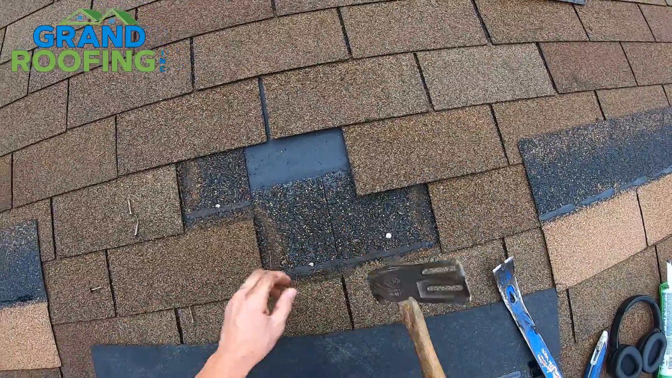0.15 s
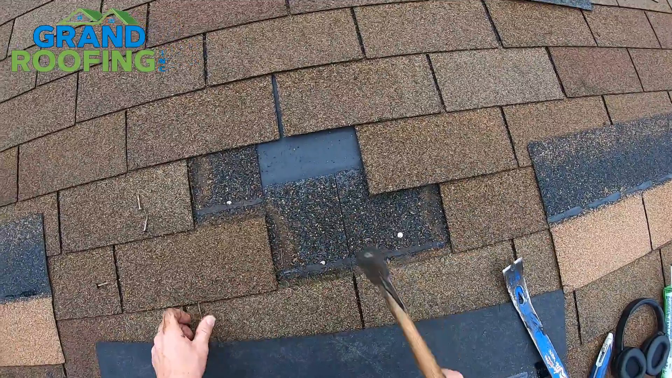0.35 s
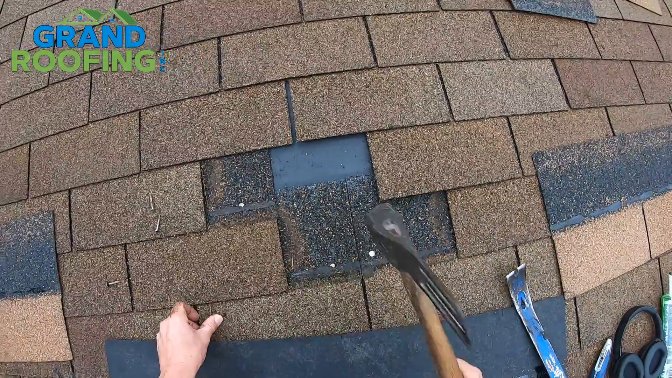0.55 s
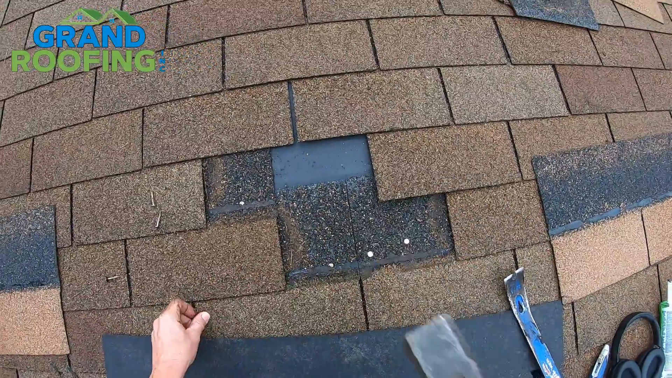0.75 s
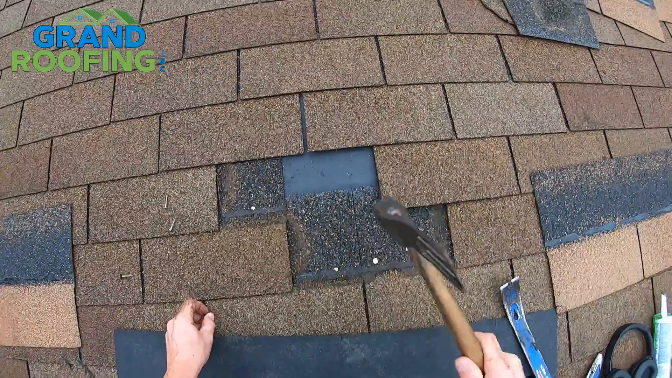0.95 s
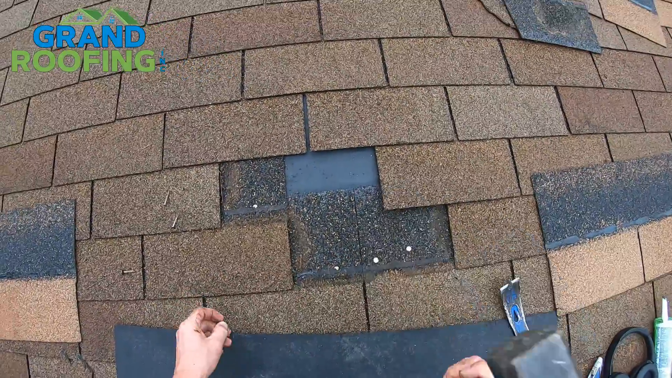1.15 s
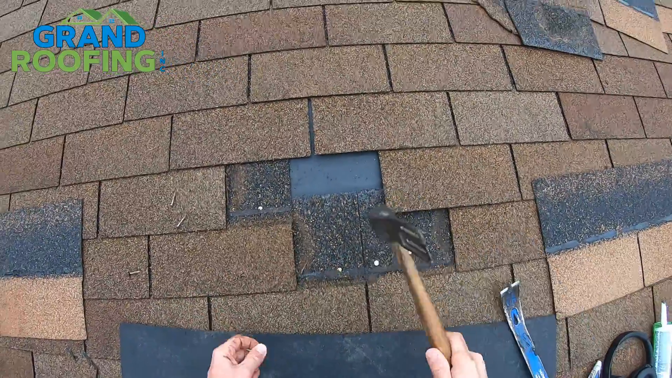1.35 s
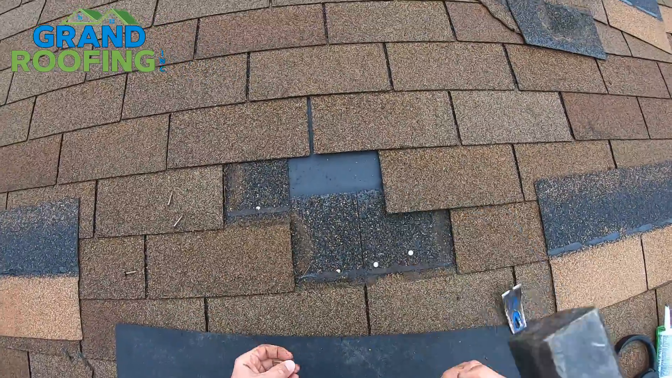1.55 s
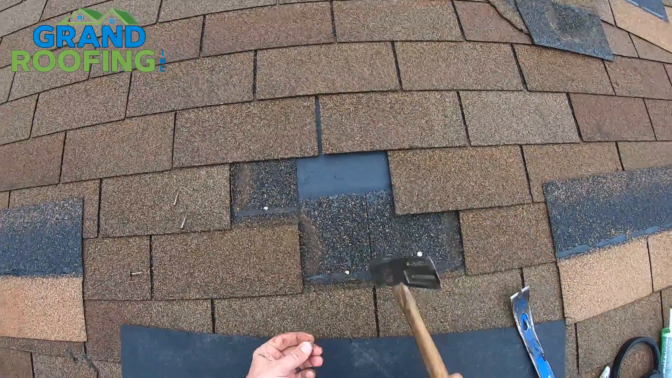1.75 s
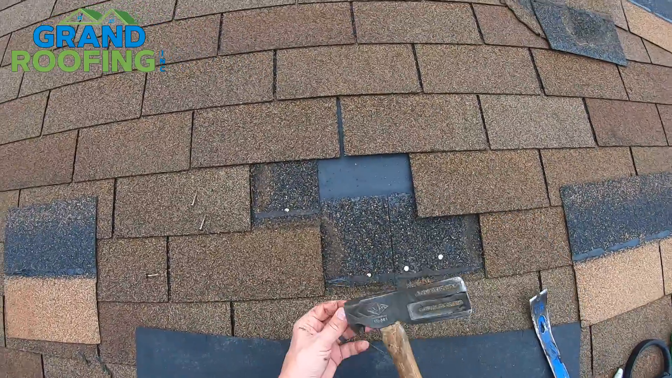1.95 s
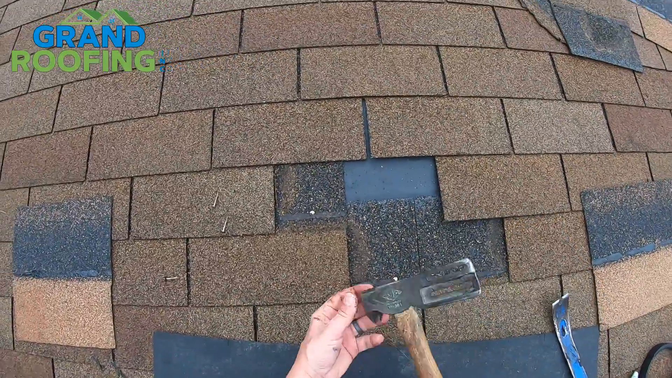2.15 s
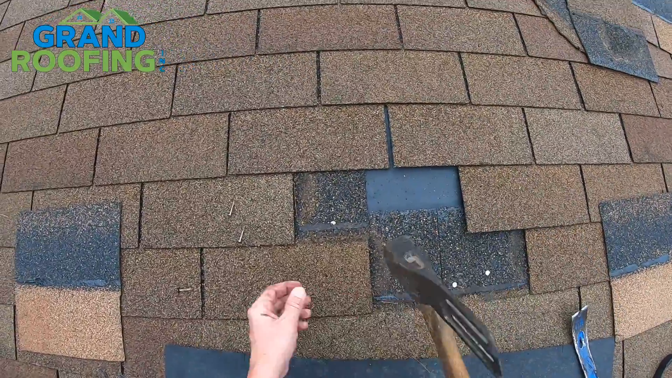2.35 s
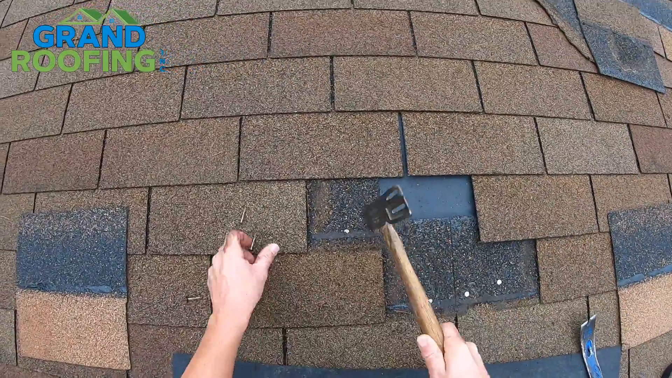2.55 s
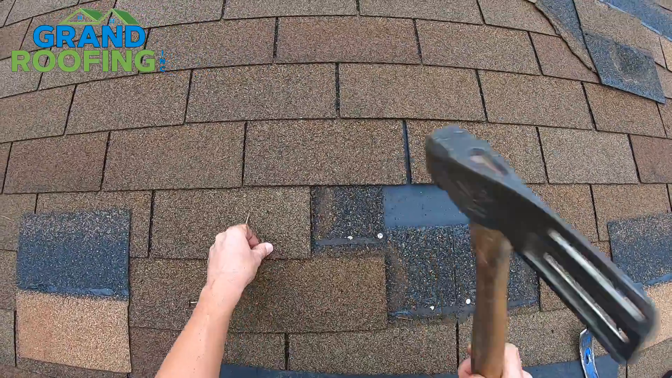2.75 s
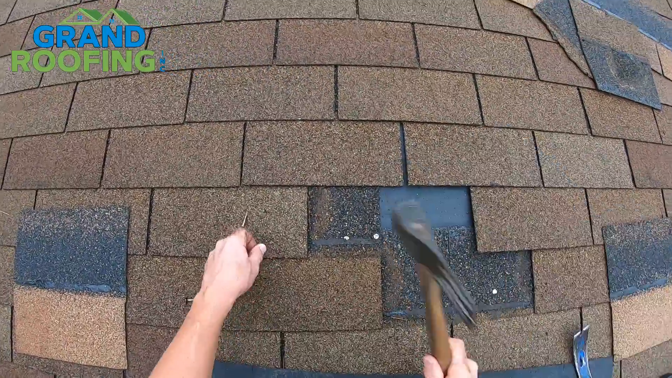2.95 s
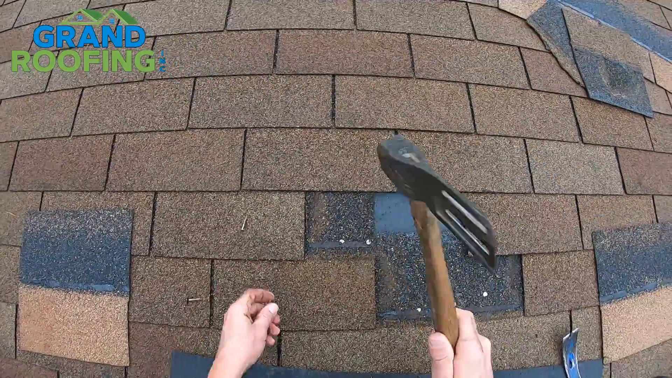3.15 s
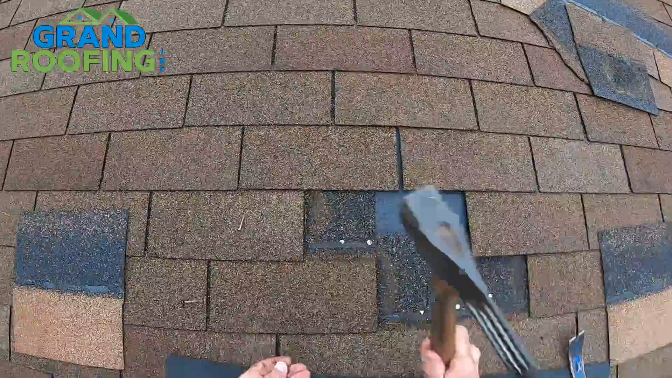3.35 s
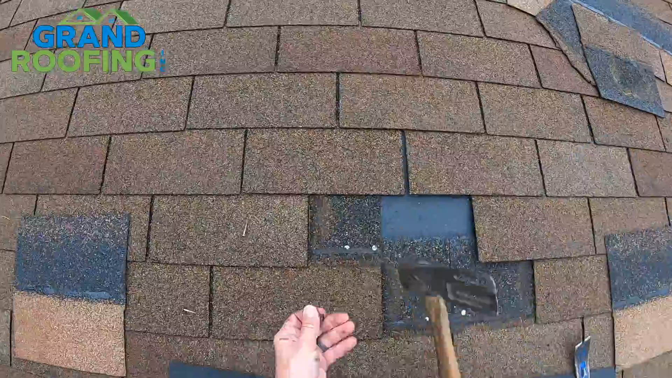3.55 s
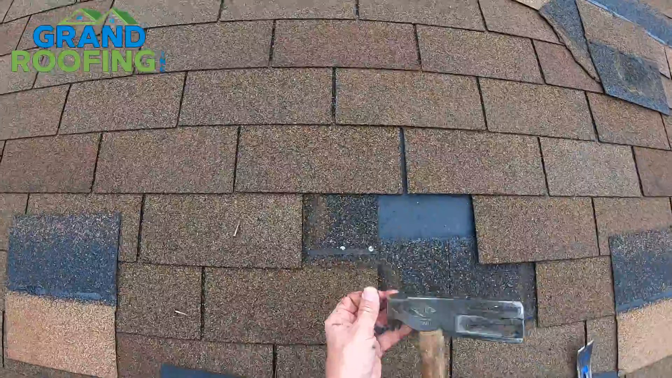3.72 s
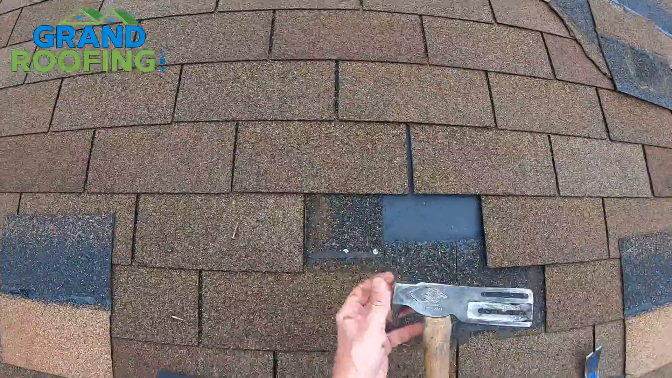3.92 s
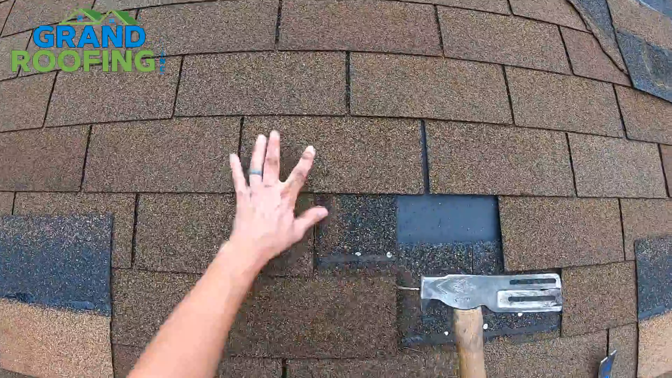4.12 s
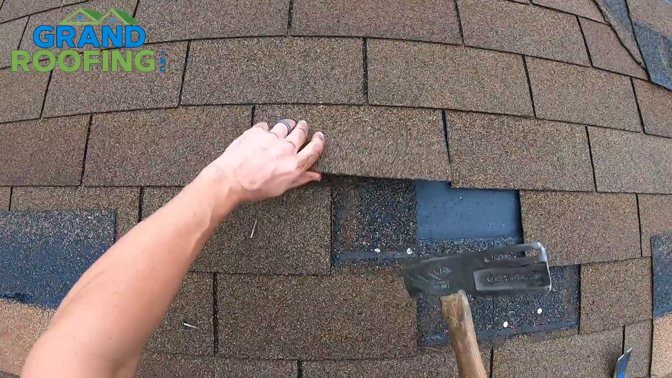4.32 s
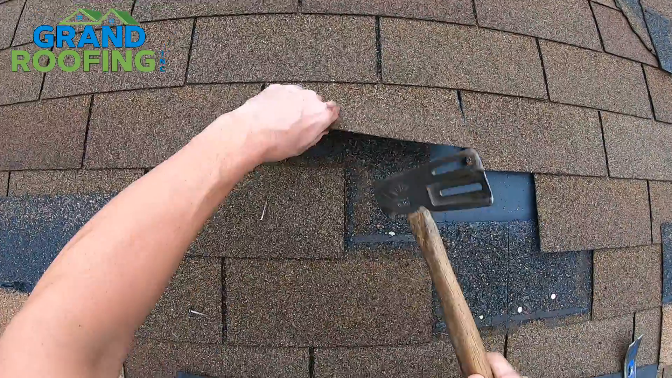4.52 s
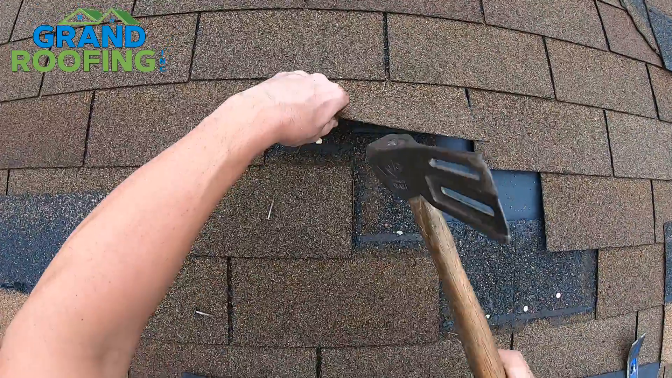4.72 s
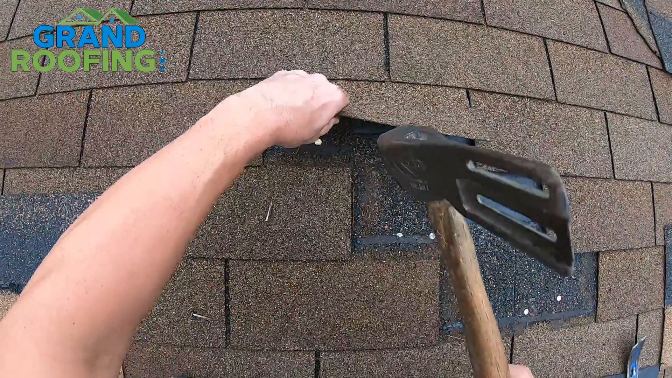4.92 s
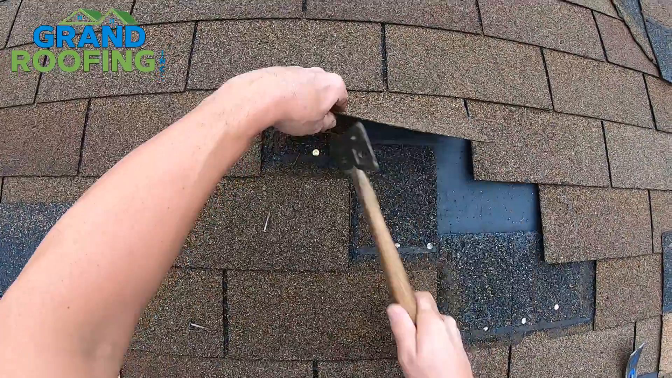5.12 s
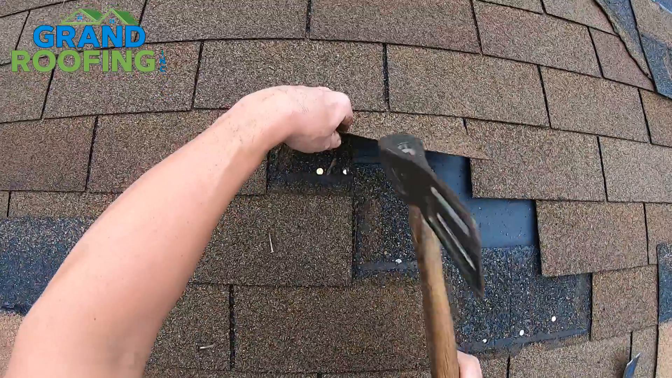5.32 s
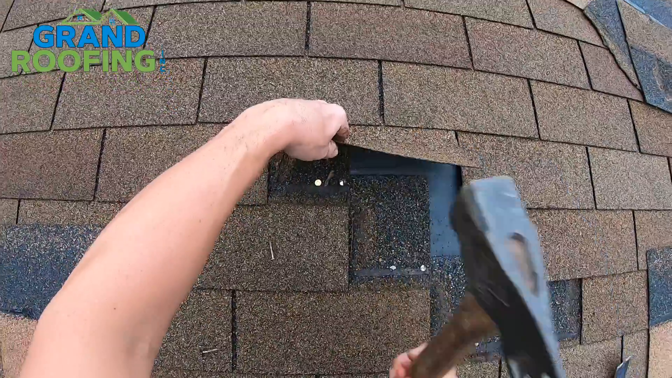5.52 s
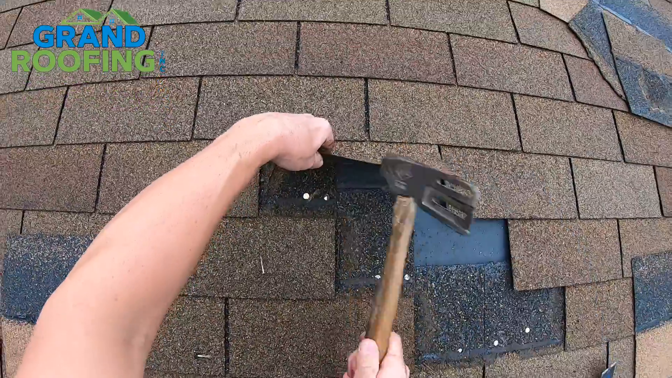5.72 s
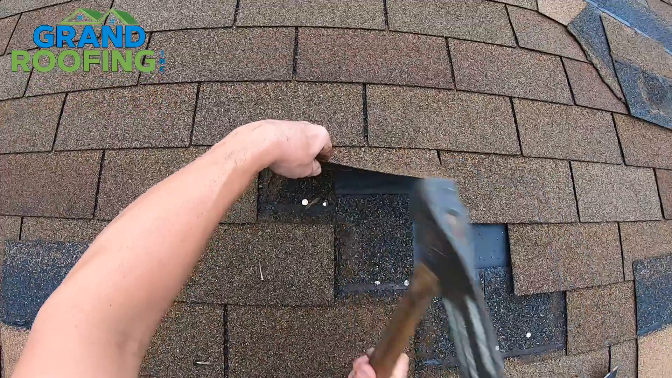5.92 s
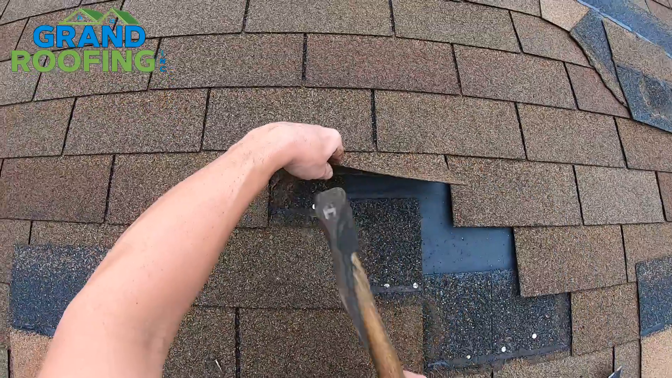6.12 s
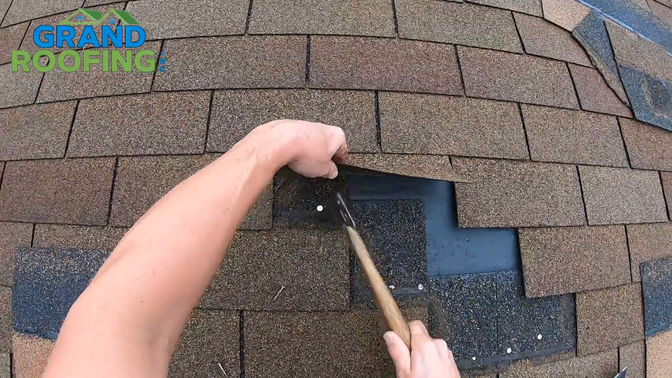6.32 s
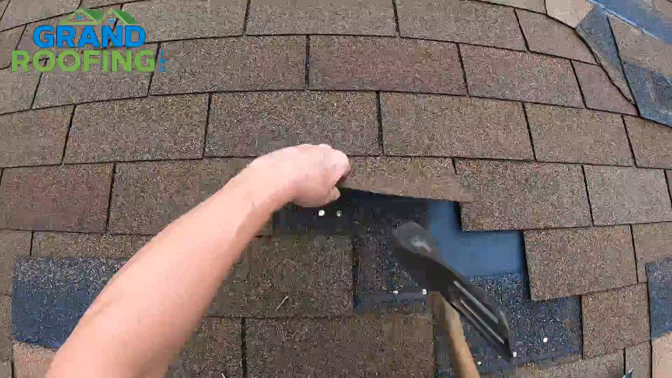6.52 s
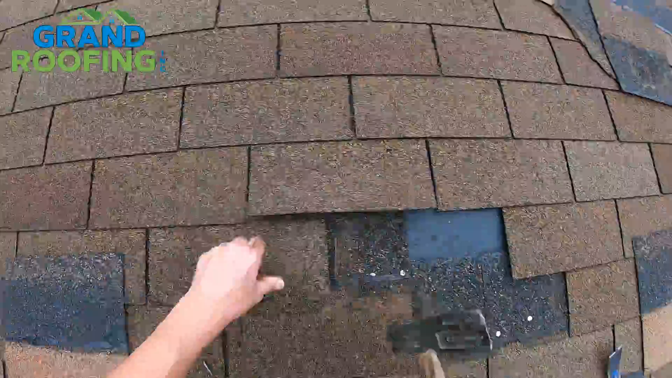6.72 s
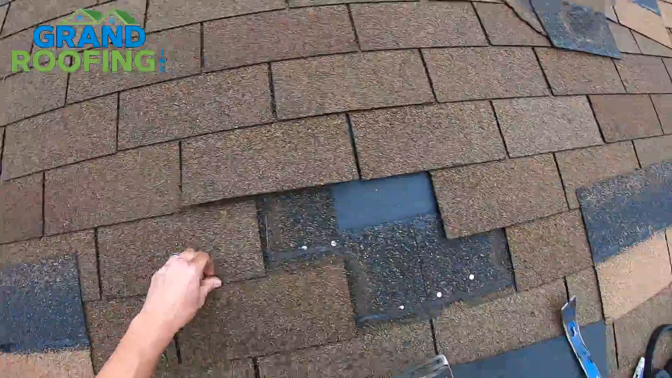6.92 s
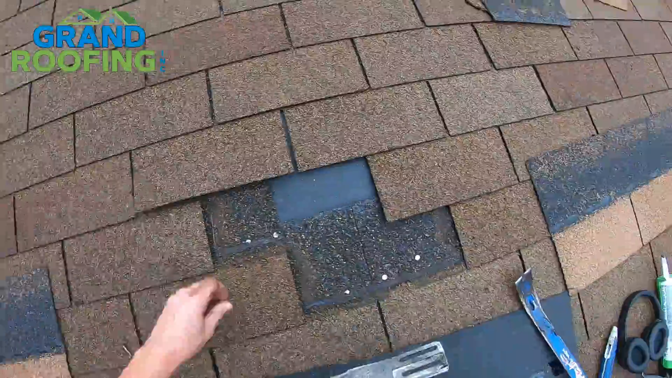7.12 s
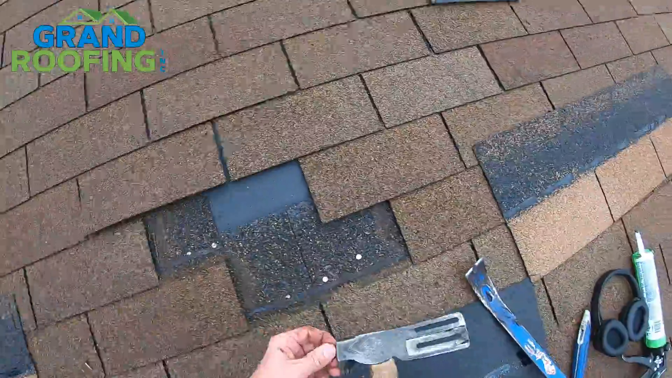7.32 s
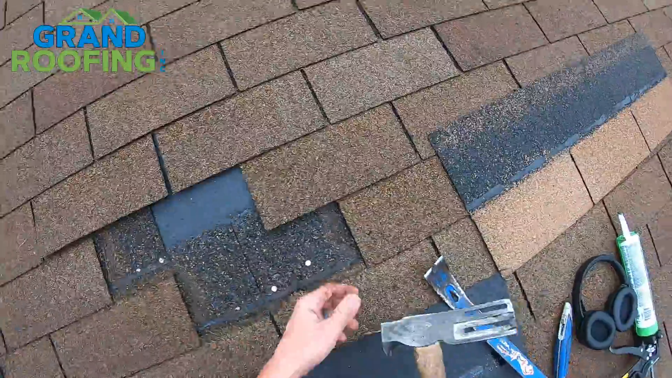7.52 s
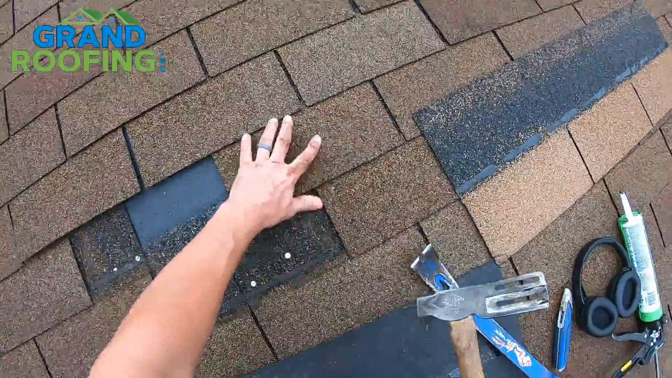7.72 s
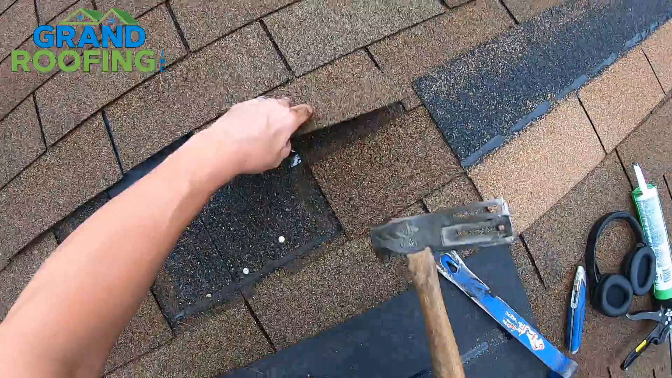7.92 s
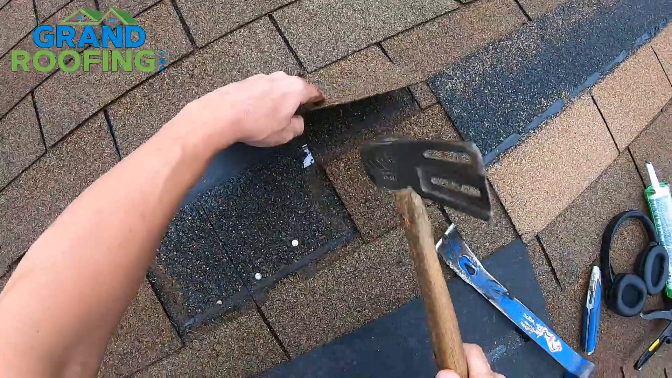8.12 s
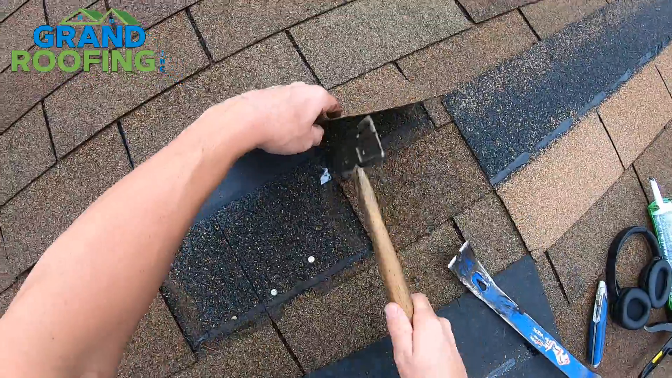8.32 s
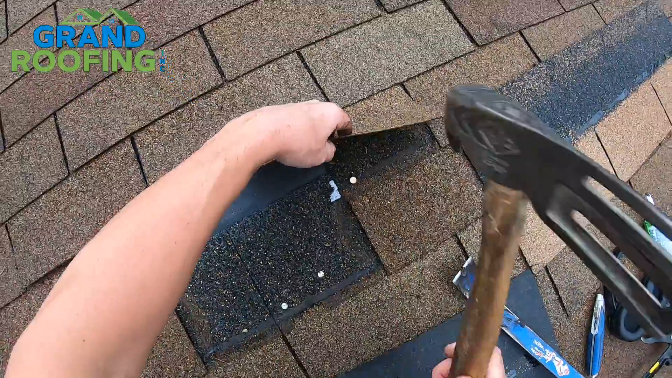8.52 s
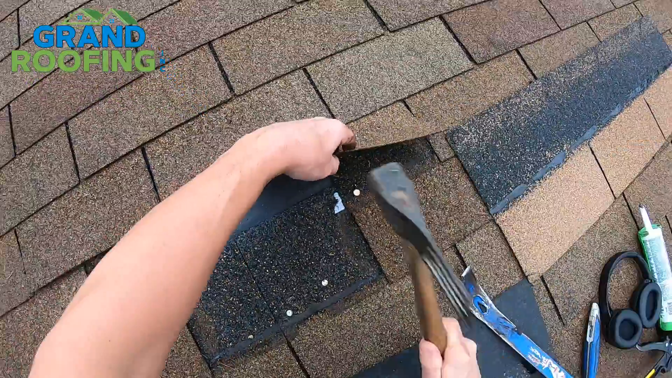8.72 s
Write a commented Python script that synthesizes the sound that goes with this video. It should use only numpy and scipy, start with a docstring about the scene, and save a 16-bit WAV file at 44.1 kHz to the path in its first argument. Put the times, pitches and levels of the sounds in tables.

```python
"""A far bird's whistle, a faint tink of steel and a soft push on wood open over outdoor hush and insects.
Then a roofer's hatchet drives nails through asphalt shingles close by: each blow is a burst of force
that sets the modes of the wooden deck ringing, with bands of noise fading in before it and out after it.
Granules, a skittering nail and snapping shingles are short resonant clicks; a lifted shingle scrapes as
filtered grains. The steel head rings as fading sines; the bird is gliding sines with a noisy echo."""
import sys
import numpy as np
from scipy import signal
from scipy.fft import rfft, irfft, next_fast_len
from scipy.io import wavfile
from scipy.ndimage import uniform_filter1d

SR = 44100
rng = np.random.default_rng(int(sys.argv[2]) if len(sys.argv) > 2 else 0)


def store_pcm(level_fs):
    """Save levels as 16-bit WAV."""
    pcm = np.round(np.clip(level_fs, -1, 1) * 32767).astype(np.int16)
    wavfile.write(sys.argv[1], SR, np.atleast_2d(pcm).T)


N = 386757

TIME = np.arange(N) / SR   # s
BLOW_TIME = TIME[:SR * 3 // 4]   # time within one event, s
OPPOSITE = np.array([[1], [-1]])   # adds to the left, subtracts from the right
CUTOFF_HZ = 16000   # nothing much is left above this
LEVEL_WINDOW_S = .025   # a blow's energy is counted as if spread over this time

# Outdoor air noise, relative: [f/Hz, level/dB per Hz]
AIR_COLOUR = [(25, -5), (60, -5), (150, -1), (330, -2.5), (500, -10), (780, -9.5), (1200, -17),
              (2500, -22.5), (3800, -23), (6000, -25.5), (7500, -26.5), (10000, -43.5), (15000, -53)]
# Far-off hush over time: [t/s, level/dB]
HUSH_CURVE = [(0.0, -72.5), (0.51, -69.5), (6.96, -66), (7.23, -69), (8.77, -63)]
# Insect hiss over time, before the trim in air(): [t/s, level/dB]
INSECT_CURVE = [(0.0, -72), (0.61, -72), (2.32, -84), (2.88, -78), (4.2, -84), (4.44, -75), (7.52, -79),
                (8.13, -70.5), (8.77, -81)]
# Insect hiss, relative: [f/Hz, level/dB per Hz]
INSECT_COLOUR = [(2500, -40), (4000, -13), (4600, -1), (5100, 0), (5900, -9.5), (6800, -6), (8000, -17),
                 (11000, -40)]

# Bird calls, before the trim in bird(): [t/s, level/dB, gap to the second whistle/s]
BIRD_CALLS = [(0.0, -57.5, .16), (4.82, -61.5, 0.092), (7.18, -65.5, .1)]
# First whistle, one voice: [start f/Hz, end f/Hz, relative level/dB]
FIRST_WHISTLE = [(6550, 7130, 0)]
# Second whistle, two voices at once: [start f/Hz, end f/Hz, relative level/dB]
SECOND_WHISTLE = [(7330, 8190, -6.5), (6550, 6900, -7.5)]

# Low rumble of the roof frame, relative: [f/Hz, level/dB per Hz]
RUMBLE_COLOUR = [(20, -5), (40, 1), (70, -5), (120, -15), (250, -40.5), (1000, -80.5)]
# Rumble after an average blow, its decay time, a press relative to its own level, and the level at rest
SWAY_DB, SWAY_T60_S, PRESS_SWAY_DB, REST_DB = -51, 1.9, -11, -80

# Hand and knee pressing on the deck: [t/s, peak level/dB]
PRESSES = [(0.03, -51), (4.045, -50.5), (4.24, -48), (4.85, -48.5), (6.879, -55), (7.835, -46)]
# Shingle rubbing over grit, dull under a palm and bright sheet on sheet:
# [start t/s, length/s, level before dulling/dB, treble edge f/Hz]
RUBS = [(2.679, 0.069, -51, 7000), (4.245, .3, -53, 4000), (5.151, 0.11, -59.5, 7000),
        (5.265, .095, -41.5, 8970), (5.775, 0.056, -39.5, 9000), (6.72, .15, -61, 3980),
        (6.86, .08, -51, 1000), (6.972, .085, -48, 900), (7.821, .07, -48, 1200), (7.89, .21, -53, 4500)]
# Scraped grit, relative: [f/Hz, level/dB per Hz]
RUB_COLOUR = [(100, -5.5), (400, 1), (800, 2), (2200, 0), (4500, -4), (8000, -12), (11000, -21),
              (16000, -32)]
RUB_ATTACK_S, RUB_RELEASE_SHARE = 0.013, 0.49   # quick bite; share of the stroke spent easing off

# Ringing modes of the free steel head: [f/Hz, relative level/dB, 60 dB decay/s]
HEAD_MODES = [(3375, -15, .3), (3510, 1, .4), (4500, -20, .08), (6648, -24, .5), (7687, -14, 0.49),
              (9502, -28, .18)]
# The head brushes a nail: [t/s, level/dB, extra level of the upper modes/dB]
TINKS = [(0.006, -55.5, -22), (1.93, -78, 26), (3.575, -53, -2), (3.668, -62, 14), (3.885, -63.5, -6),
         (5.8, -59, -8), (7.417, -42.5, -1.5)]
# Blows ring the head too, more on a stiffer spot
BLOW_RING_DB, BLOW_RING_UPPER_DB, RING_DB_PER_OCTAVE = -59, -5, 32

# Clearest light ticks, a loose nail skittering at 0.64 to 0.87 s and granules elsewhere,
# before the trims in tick(): [t/s, peak level/dB]
LIGHT_TICKS = [(0.5256, -23), (0.6397, -22), (0.6743, -33), (0.694, -26.5), (0.7356, -25), (0.7694, -29),
               (0.838, -31.5), (0.8587, -27), (0.9791, -24), (2.0007, -39.5), (2.6984, -27.5), (2.837, -38),
               (3.6566, -22.5), (6.1818, -31), (6.192, -28), (6.2875, -15), (6.5275, -30), (6.6187, -37.5),
               (6.848, -30.5), (6.8763, -30.5), (7.416, -30), (8.45, -26)]
# Stiff shingle snapping as it bends, before the trims in tick():
# [t/s, peak level/dB, centre f/Hz, body level/dB]
SNAPS = [(4.239, -36, 2650, -47), (4.4281, -27.5, 4930, -34), (4.4318, -23.5, 4300, -30),
         (4.702, -39, 3300, -48), (5.2132, -26, 3310, -29), (5.3275, -19, 3500, -41),
         (5.7795, -28.5, 3620, -39), (5.7994, -22, 3170, -37), (6.9069, -26, 4500, -41),
         (7.017, -37, 3280, -43), (7.9655, -28.5, 4840, -33), (7.9922, -26, 4600, -18.5),
         (8.0224, -31.5, 2680, -51), (8.2427, -29, 4290, -31.5)]
LIGHT_TICK_HZ, LIGHT_TAP_DB = 3800, -27   # average click centre; the tap relative to it, before trims
# Fainter granules: pace, level before trims, random spread, and how they shrink with the wait
STRAYS_PER_S, STRAY_DB, STRAY_SPREAD_DB, STRAY_FALL_DB_PER_S = 14, -39, 3.5, 25
# Boards settling: peak level before fading, time span, fading with the wait
SETTLE_DB, SETTLE_WITHIN_S, SETTLE_FALL_DB_PER_S = -45, 0.27, 30.5

# Hatchet blows: [t/s, strength/dB, stiffness of the spot as a pitch factor,
# extra knock of the board/dB, extra steel edge/dB]
BLOWS = [(0.4936, 0.53, .95, 0, -3), (0.948, 0.76, .93, 0, -2.5), (1.3599, -2.4, .97, 2.5, -5),
         (1.7863, 0.65, .95, 2.5, 4), (2.615, -4, 1.02, -2.5, 1), (3.0973, -0.6, 1, -3, -4),
         (3.5161, .5, 1.12, 3.5, 0), (5.2397, 0, 1.02, 0.2, 8), (5.7123, -0.4, 1, 1, -5),
         (6.095, 1.5, 1.1, 3, -4), (6.445, 0.6, 1.1, 2, 1), (8.417, 1.7, 1.04, -6.5, 7.5)]
# Average blow as boom, thud, knock, clack, crack and steel edge, before the trims in blows();
# harder is brighter: [level/dB, dB gained per dB of strength]
REGISTERS = [(-19, .5), (-18.5, .5), (-22, .9), (-24, .8), (-27, 1.87), (-38, 1)]
# Where one register gives way to the next: [f/Hz]
REGISTER_EDGES = [120, 260, 630, 1500, 5000]
BOOM_LOSS_DB_PER_OCTAVE = 19   # a stiffer spot booms less
# Roof deck, from whole-sheet bending to short waves round the nail; each blow varies pitch and level:
# [f/Hz, relative level/dB, 60 dB decay/s]
DECK_MODES = [(60.5, -1, .13), (91.6, -3, .12), (143.6, 0.5, .055), (223, -2, .04), (313, 0, 0.036),
              (418, -2.5, .03), (556, -7, .03), (707, -1, .035), (793, -1, .04), (1002, -3, .025),
              (1192, -2, 0.021), (1676, -3.5, 0.0079), (2090, -2, .007), (2900, 1, .007), (3270, 1, 0.0076),
              (4100, -2, 0.0031), (5240, 0, 0.0037), (6960, -0.5, 0.005), (8770, -9, 0.0037)]
# Sound spreading through rafters and yard, before the trims in spread():
# [f/Hz, early level/dB, early 60 dB decay/s, late level/dB, late 60 dB decay/s]
SPREAD = [(35, -47, 0.29, -52, 1.2), (70, -31, .22, -43.5, 0.8), (140, -28, 0.18, -41.5, 0.55),
          (280, -30, .07, -57, 0.85), (560, -33, .065, -60.5, 1.4), (1100, -31, .065, -60.5, 1.0),
          (2200, -34.5, 0.084, -61.5, 1.1), (4504, -38.5, 0.11, -61, 0.7), (8000, -52, 0.1, -71.5, .8),
          (13000, -70, .08, -88, .8)]
# Soft dull noise fading in before each crack, before the trim in spread(); rows are blended:
# [f/Hz, level/dB, 60 dB rise/s]
FADE_IN = [(35, -48, 0.28), (70, -27.5, 0.1071), (140, -19, 0.0633), (280, -23, 0.01), (560, -26, 0.0647),
           (950, -28.5, 0.0377), (1400, -47, 0.048), (2700, -48, 0.12), (4500, -63, -0.05),
           (13000, -88, 0.5)]

# Two microphone ports: [f/Hz, left minus right level/dB, lead of the left/rad]
PORTS = [(60, 0.36, -0.19), (350, -0.85, 0.27), (650, -4.5, 0.27), (850, -6.5, -.2), (1030, -7.5, 0.32),
         (1400, -4.5, .55), (2000, -3, 0.0033), (2400, 0.5, -0.013), (3100, -3.5, 0.004),
         (5004, -2.5, -0.71), (7000, -4.5, -0.84), (8200, -3, -0.83), (9300, -3, 0.72), (15000, -2, 0.18)]


def from_db(db):
    """Turn decibels into a gain."""
    return 10 ** (np.asarray(db) / 20)


def rms_one(x):
    """Scale a sound so that its average strength (rms) is 1."""
    return x / np.sqrt(np.mean(x ** 2) + 1e-20)


def at_hz(rows, hz):
    """Read every column of a table at a frequency, blending rows on a log-frequency axis."""
    freq, *columns = np.transpose(rows)
    log_hz = np.log(np.maximum(hz, 1))
    return [np.interp(log_hz, np.log(freq), column) for column in columns]


def add(out, s, sound):
    """Mix a sound in from time s, cutting off whatever falls outside the scene."""
    start = round(s * SR)
    first = max(start, 0)
    last = max(min(start + sound.shape[-1], N), start)
    out[..., first:last] += sound[..., first - start:last - start]


def fade(t, t60):
    """Die away smoothly, losing 60 dB in t60 seconds."""
    return np.exp(-np.log(1000) * t / t60)


def butter(x, order, hz, kind="low"):
    """Filter a sound: keep the lows, the highs or a band."""
    return signal.sosfilt(signal.butter(order, hz, kind, fs=SR, output="sos"), x)


def resonate(x, hz, t60):
    """Let a force drive one resonance, whose gain is 1 at its peak frequency."""
    r = fade(1 / SR, t60)
    drive = x.copy()
    drive[..., 2:] -= x[..., :-2]
    feedback = [1, -2 * r * np.cos(2 * np.pi * hz / SR), r * r]
    return signal.lfilter([(1 - r * r) / 2], feedback, drive + 1e-18)


def colour(x, spectrum):
    """Shape a noise by a spectrum table and bring it to rms 1."""
    size = next_fast_len(N)
    gain = from_db(at_hz(spectrum, np.fft.rfftfreq(size, 1 / SR))[0])
    return rms_one(irfft(rfft(x, size) * gain, size)[:N])


def flicker(per_s):
    """Make a random wobble with per_s new values a second, joined by straight lines, at rms 1."""
    steps = rng.standard_normal(N // 20)
    return rms_one(np.interp(TIME * per_s, np.arange(len(steps)), steps))


def grains(per_s, spread_db):
    """Scatter random single-sample clicks of uneven size."""
    sizes = from_db(spread_db * np.minimum(rng.exponential(1, N), 4))
    return (rng.random(N) < per_s / SR) * sizes * rng.choice([-1, 1], N)


def contact(t, slip, slip_t60, scatter):
    """Start with one sharp impact, then stick and slip briefly, a little differently on each side."""
    common, apart = slip * rng.standard_normal((2, len(t))) * fade(t, slip_t60)
    # the difference between neighbouring samples favours short waves
    force = common + scatter * np.diff(apart, prepend=0) * OPPOSITE
    force[:, 0] += 1
    return force


def tick(db, hz, tap_db, tick_db=-1., body_db=-5.0, ring_t60=.002, tap_hz=1200):
    """A small impact makes the stiff shingle click, and its body answers with a duller tap."""
    force = contact(TIME[:SR // 20], slip=0.11, slip_t60=.014, scatter=0.49)
    click = resonate(resonate(force, hz, ring_t60), hz, 0.00058)
    varied_hz = tap_hz * np.exp(0.33 * rng.normal())
    tap = resonate(resonate(force, varied_hz, 0.0043), tap_hz, 0.0013)
    click_part = from_db(db + tick_db) * click / abs(click).max()
    return click_part + from_db(tap_db + body_db) * tap / abs(tap).max()


def light_tick(db, pitch_spread):
    """A granule or a loose nail ticks on the shingle at a slightly random pitch."""
    return tick(db, LIGHT_TICK_HZ * np.exp(pitch_spread * rng.normal()), db + LIGHT_TAP_DB)


def register_levels():
    """A blow's strength and the spot it lands on set the level of each register."""
    _, strength, stiffness, knock, edge = np.transpose(BLOWS)
    average, growth = np.transpose(REGISTERS)
    levels = average + np.outer(strength, growth)
    levels[:, 0] -= BOOM_LOSS_DB_PER_OCTAVE * np.log2(stiffness)
    levels[:, 2] += knock
    levels[:, -1] += edge
    return levels


def far_noise(spectrum, curve, width):
    """A distant noise follows a slow level curve and is wider in the treble."""
    mid, side = (colour(rng.standard_normal(N), spectrum) for _ in range(2))
    side = butter(side, 1, 700, "high")
    level = from_db(np.interp(TIME, *np.transpose(curve)))
    return level * (mid + width * side * OPPOSITE)


def air(insects_db=1.):
    """Far-off hush and insects in the trees, both shaped noise."""
    hush = far_noise(AIR_COLOUR, HUSH_CURVE, width=.5)
    insects = far_noise(INSECT_COLOUR, INSECT_CURVE, width=.6)
    return hush + from_db(insects_db) * insects


def bird(length_s=.06, waver_hz=190., echo_t60=.6, bird_db=-5.5):
    """Thin whistles glide upward, smeared by trees and houses."""
    out, t = np.zeros(N), BLOW_TIME
    progress = np.clip(t / length_s, 0, 1)
    for s, db, gap in BIRD_CALLS:
        for start, voices in ((s, FIRST_WHISTLE), (s + gap, SECOND_WHISTLE)):
            for start_hz, end_hz, voice_db in voices:
                glide = start_hz + (end_hz - start_hz) * np.sin(np.pi * progress / 2)
                waver = rms_one(uniform_filter1d(rng.standard_normal(len(t)), size=90))
                hz = glide + waver_hz * waver
                whistle = np.sin(2 * np.pi * np.cumsum(hz) / SR) * np.sin(np.pi * progress)
                smear = rng.standard_normal(len(t)) * fade(t, echo_t60)
                echoes = signal.fftconvolve(whistle, smear)[:len(t)]
                call = whistle + 1.2 * echoes / abs(echoes).max()
                add(out, start, from_db(db + voice_db + bird_db) * call)
    return out


def sway():
    """The roof frame goes on rumbling after every blow and shift of weight."""
    power = np.full(N, from_db(REST_DB) ** 2)
    boom_change = register_levels()[:, 0] - REGISTERS[0][0]
    pushes = [(s, SWAY_DB + db) for (s, *_), db in zip(BLOWS, boom_change)]
    pushes += [(s, db + PRESS_SWAY_DB) for s, db in PRESSES]
    for s, db in pushes:
        add(power, s, (from_db(db) * fade(TIME, SWAY_T60_S)) ** 2)
    return np.sqrt(power) * colour(rng.standard_normal(N), RUMBLE_COLOUR)


def loose_grit(shaken_db=-55.5, idle_db=-82., settle_t60=0.63):
    """Fine grit thrown up by a blow patters down again; a little always shifts under the worker."""
    activity = np.full(N, from_db(idle_db))
    for s, *_ in BLOWS:
        add(activity, s, from_db(shaken_db) * fade(BLOW_TIME, settle_t60))
    patter = sum(resonate(grains(26, 4.3), hz, 0.0028) for hz in (900, 1500, 2740, 3430, 4440))
    return activity * rms_one(butter(patter, 2, 7000))


def scraping(crackle_db=4.0, catch_db=4.5, grains_per_s=1500, catches_per_s=110):
    """Rough shingle scrapes over grit, catching and letting go."""
    out, t = np.zeros(N), BLOW_TIME
    catching = rms_one(from_db(catch_db * flicker(catches_per_s)))
    scrape = catching * colour(grains(grains_per_s, crackle_db), RUB_COLOUR)
    for s, length, db, edge_hz in RUBS:
        grit = scrape[round(s * SR):][:len(t)]
        ease_off = (length - t) / (RUB_RELEASE_SHARE * length)
        stroke = np.minimum(t / RUB_ATTACK_S, ease_off)[:len(grit)]
        add(out, s, from_db(db) * np.clip(stroke, 0, 1) * butter(grit, 1, edge_hz))
    return out


def presses():
    """The deck's three lowest modes give softly under shifting weight."""
    out, t = np.zeros(N), BLOW_TIME
    for s, db in PRESSES:
        push = rng.standard_normal(len(t)) * fade(t, 0.2)
        thud = sum(resonate(resonate(push, hz, t60), hz, 0.025) for hz, _, t60 in DECK_MODES[:3])
        add(out, s, from_db(db) * thud / abs(thud).max())
    return out


def head():
    """The steel head rings when it strikes or brushes a nail; the balance of its modes varies."""
    out, t = np.zeros(N), BLOW_TIME
    struck = []
    for s, _, stiffness, _, edge in BLOWS:
        ring_db = BLOW_RING_DB + edge / 2 + RING_DB_PER_OCTAVE * np.log2(stiffness)
        struck.append((s, ring_db, BLOW_RING_UPPER_DB))
    for s, db, upper_db in TINKS + struck:
        for k, (hz, mode_db, t60) in enumerate(HEAD_MODES):
            gain = from_db(db + mode_db + upper_db * (k > 2))
            add(out, s, gain * np.sin(2 * np.pi * hz * t) * fade(t, t60))
    return out


def strays(pitch_spread=0.16, after_rub_db=-8.5, count=4):
    """Every blow and every rub frees a few granules that hop down the slope at random."""
    out = np.zeros((2, N))
    causes = [(s, 0) for s, *_ in BLOWS]
    causes += [(s + length, after_rub_db) for s, length, *_ in RUBS]
    for s, offset_db in causes:
        for wait in np.cumsum(rng.uniform(.2, 1.8, count)) / STRAYS_PER_S:
            db = STRAY_DB + offset_db - STRAY_FALL_DB_PER_S * wait + STRAY_SPREAD_DB * rng.normal()
            add(out, s + wait, light_tick(db, pitch_spread))
    return out


def ticks(pitch_spread=.08, lag_s=.0009):
    """Granules and a loose nail tick, all much alike, and the bent shingle snaps."""
    out = np.zeros((2, N))
    for s, db in LIGHT_TICKS:
        add(out, s + lag_s, light_tick(db, pitch_spread))
    for s, *snap in SNAPS:
        add(out, s + lag_s, tick(*snap))
    return out


def settling(first_s=0.067, mode_spread_db=5., count=3):
    """Shaken boards knock softly against the rafters and ring the deck's middle modes."""
    out, t = np.zeros(N), TIME[:SR // 10]
    for s, *_ in BLOWS:
        for wait in first_s + SETTLE_WITHIN_S * rng.random(count):
            knock = np.zeros(len(t))
            for k, (hz, db, t60) in enumerate(DECK_MODES[3:11]):
                gain = (-1) ** k * from_db(db + mode_spread_db * rng.normal())
                knock += gain * np.sin(2 * np.pi * hz * t) * fade(t, t60)
            level = from_db(SETTLE_DB - SETTLE_FALL_DB_PER_S * wait)
            add(out, s + wait, level * knock / abs(knock).max())
    return out


def spread(width=0.56, fade_in_db=-4.0, early_db=-2.5, late_db=-3.5, rattle_db=3.):
    """Soft dull noise fades in before each crack; after it the roof's noise decays fast, then faintly."""
    out, t = np.zeros((2, N)), BLOW_TIME
    edges = 25 * 2 ** np.arange(0, 9.6, .5)   # half-octave bands, Hz
    white = rng.standard_normal((2, 2, N))
    times, levels = np.array(BLOWS)[:, 0], register_levels()
    strengths = levels - levels.mean(axis=0)
    rattle = rms_one(from_db(rattle_db * flicker(200)))   # loose sheets chatter against each other
    for k, (low, high) in enumerate(zip(edges, edges[1:])):
        hz = np.sqrt(low * high)
        early, early_t60, late, late_t60 = at_hz(SPREAD, hz)
        before_db, rise = at_hz(FADE_IN, hz)
        early_part = from_db(early + early_db) * fade(t, early_t60)
        late_part = from_db(late + late_db) * fade(t, late_t60)
        after = np.hypot(early_part, late_part)
        before = from_db(before_db + fade_in_db) * fade(t, rise)[::-1]
        shape = np.concatenate([before, after])
        envelope = np.zeros(N)
        for s, db in zip(times, strengths[:, np.searchsorted(REGISTER_EDGES, hz)]):
            add(envelope, s - len(t) / SR, from_db(0.76 * db) * shape)
        mid, side = rms_one(butter(white[k % 2], 2, [low, high], "band"))
        stereo = mid + width * hz / (hz + 900) * side * OPPOSITE   # wider in the treble
        out += envelope * (rattle if k > 7 else 1) * stereo
    return out


def house_echo(x, delay_s=0.12, echo_db=-34.5, low_hz=220, high_hz=480):
    """A neighbouring wall sends the knock back, dull and faint."""
    dull = butter(x + 1e-18, 2, [low_hz, high_hz], "band")
    out = np.zeros((2, N))
    add(out, delay_s, from_db(echo_db) * dull)
    return out


def blows(mode_spread_db=2.04, detune=.035, register_db=(1., 1.3, 0., -1.3, -.5, .5),
          lowest_hz=42, cushion_hz=5200):
    """The nail drives the deck's modes; every blow weights and tunes them differently."""
    out, t = np.zeros((2, N)), BLOW_TIME[:SR // 3]
    for (s, _, pitch, *_), levels in zip(BLOWS, register_levels()):
        force = contact(t, slip=.1, slip_t60=.02, scatter=0.64)
        registers = np.zeros((len(levels), 2, len(t)))
        for k, (hz, db, t60) in enumerate(DECK_MODES):
            register = np.searchsorted(REGISTER_EDGES, hz)
            spot_pitch = pitch if register < 2 else 1   # stiffness tunes only boom and thud
            tuned = hz * spot_pitch * np.exp(detune * rng.normal())
            # t60 evens out the modes' starting strength
            gain = (-1) ** k * from_db(db + mode_spread_db * rng.normal()) * t60
            registers[register] += gain * resonate(force, tuned, t60)
        # asphalt muffles the wood; only steel on steel reaches the top
        registers[:-1] = butter(registers[:-1], 4, cushion_hz)
        for sound, db, trim in zip(registers, levels, register_db):
            energy = np.sum(sound.mean(axis=0) ** 2)
            add(out, s, -from_db(db + trim) * sound * np.sqrt(LEVEL_WINDOW_S * SR / energy))
    return butter(out + 1e-18, 2, lowest_hz, "high")


def ports(x):
    """Near sounds reach the two microphone ports with different levels and timing at each pitch."""
    size = next_fast_len(N + SR // 10)
    balance_db, lead = at_hz(PORTS, np.fft.rfftfreq(size, 1 / SR))
    tilt = from_db(balance_db / 2) * np.exp(.5j * lead)
    # the sizes of the two gains always add up to 2
    pair = np.array([tilt, 1 / tilt]) * 2 / (abs(tilt) + 1 / abs(tilt))
    return irfft(rfft(x, size) * pair, size)[:, :N]


def scene():
    """The work at arm's length, with the outdoors behind it."""
    background = air() + bird() + sway()
    hand_work = scraping() + presses() + head()
    small_sounds = loose_grit() + strays() + ticks()
    hits = blows()
    near = hand_work + small_sounds + settling() + spread() + house_echo(hits) + hits
    return background + ports(near)


def record(dry, ceiling=.85, treble_hz=11500):
    """Peaks are rounded, the treble rolls off and the top is cut."""
    rounded = dry / (1 + (dry / ceiling) ** 4) ** (1 / 4)
    dull = butter(rounded, 4, treble_hz)
    return signal.sosfilt(signal.ellip(8, .1, 80, CUTOFF_HZ, fs=SR, output="sos"), dull)


dry = scene()
out = record(dry)
store_pcm(out)
```